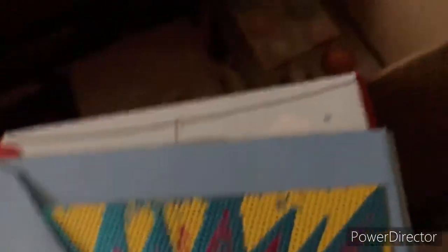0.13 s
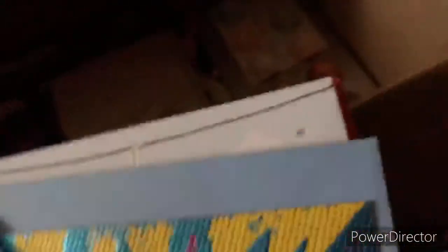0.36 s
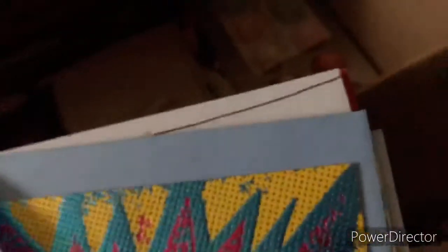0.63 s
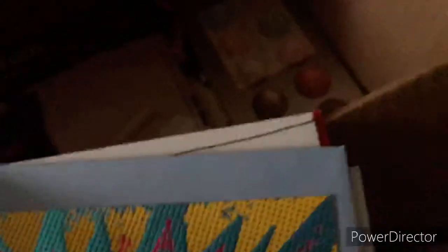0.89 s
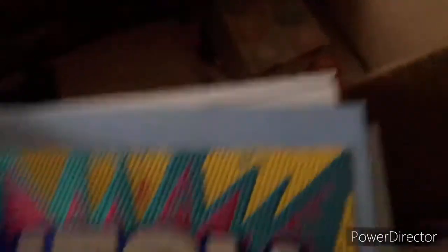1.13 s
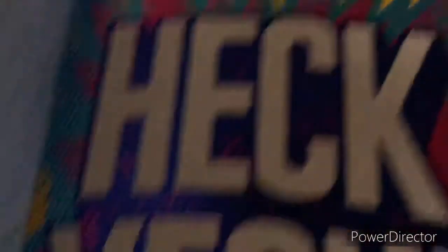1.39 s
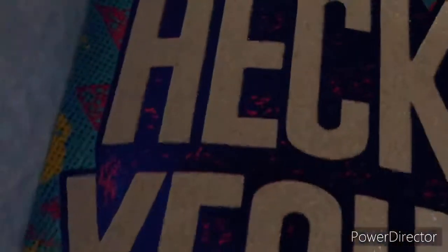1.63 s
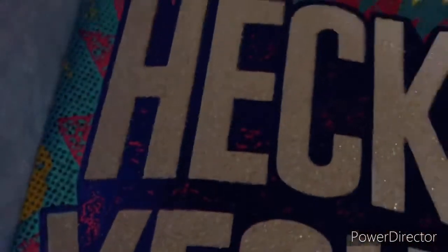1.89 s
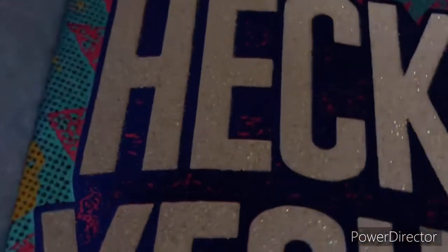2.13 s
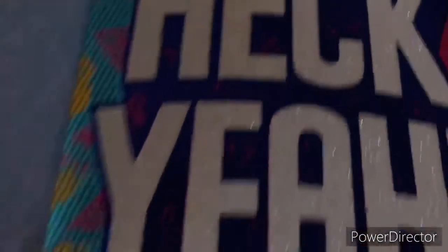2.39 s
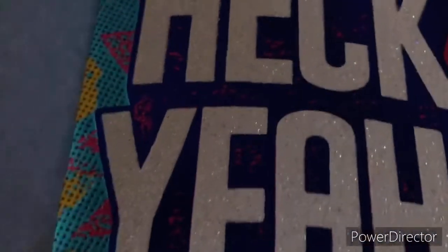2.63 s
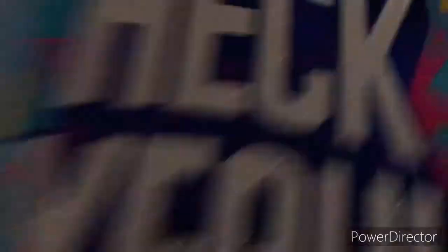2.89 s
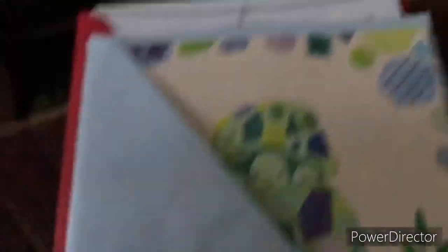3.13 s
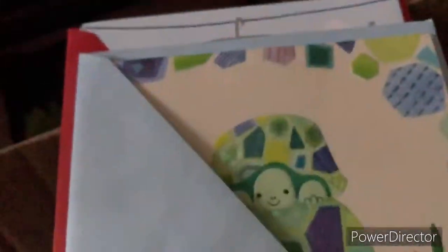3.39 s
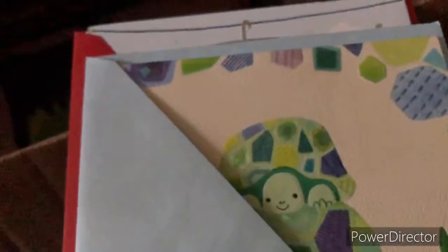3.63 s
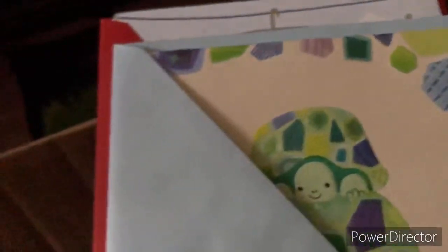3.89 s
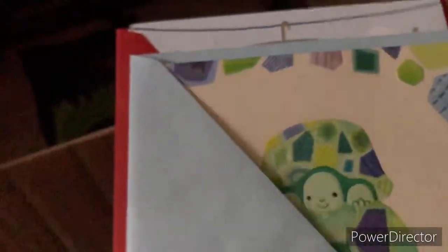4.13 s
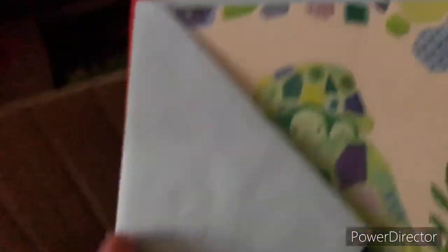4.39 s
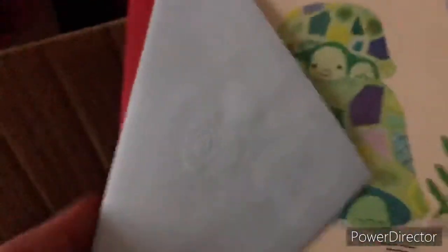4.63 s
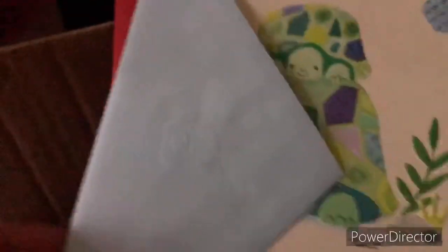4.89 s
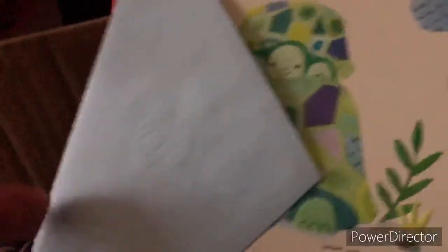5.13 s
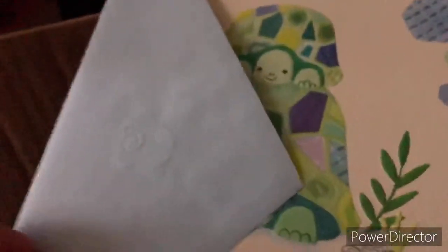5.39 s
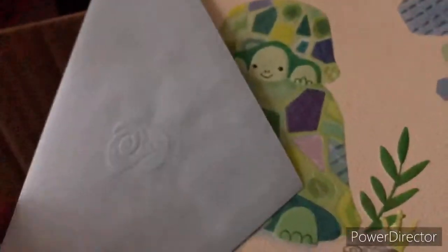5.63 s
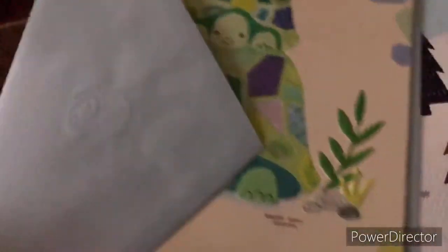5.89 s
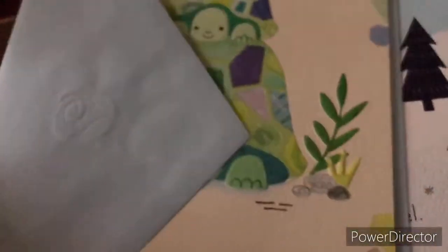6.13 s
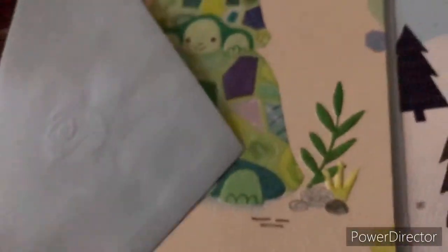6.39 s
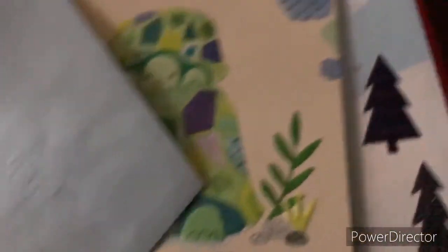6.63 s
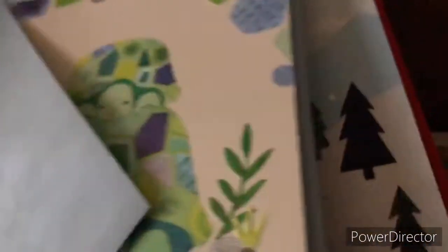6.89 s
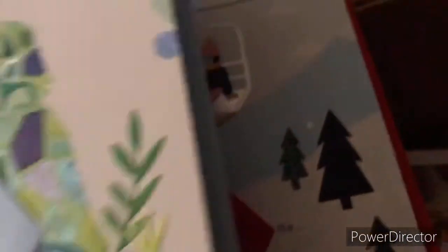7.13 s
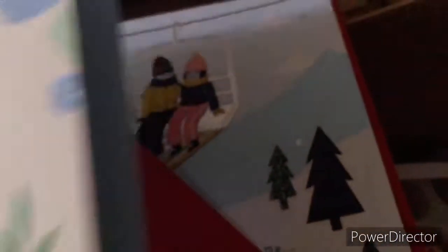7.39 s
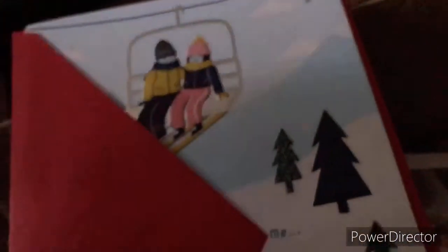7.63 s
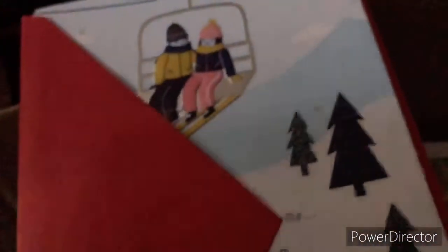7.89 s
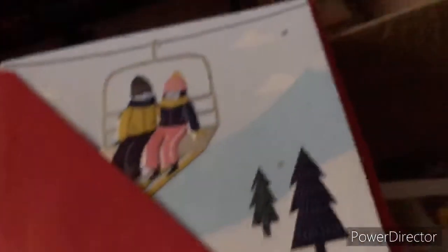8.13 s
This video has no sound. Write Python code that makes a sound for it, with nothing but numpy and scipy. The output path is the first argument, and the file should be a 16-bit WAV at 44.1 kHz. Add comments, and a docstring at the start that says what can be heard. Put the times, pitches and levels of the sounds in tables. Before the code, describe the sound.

Close mono sound of stiff paper cards and envelopes being leafed through in a quiet, dry room with very faint hiss. Soft, airy sliding rustles start at once, with small bumps around 0.5 to 0.6 seconds, then a hard flat slap at about 0.83, by far the loudest event. Papery strokes continue to about 1.5 and thin out, with a light tick and scrape near 2.2. A swelling rustle ends in a crisp knock around 2.9, and another double knock comes at 3.3. Small ticks patter from 3.6 to 4.1. From 4.2 to 6.3 the leafing is dense, overlapping hissy slides with light taps around 5.25, 5.5, 5.7 and 6.2. Afterward the rustling grows faint, with tiny clicks near 7.4 to 7.8 and near silence around 8, until a last firm slap at 8.2 and a short trailing rustle.

```python
"""Stiff paper cards and envelopes are leafed through close to a mono microphone in a quiet room.
Soft rustles lead to a hard slap near 0.83 s; strokes follow and thin out, until blows near 2.9 and 3.3 s.
From 4.2 s the leafing is dense; after 6.3 s it grows faint, and a last slap comes near 8.2 s.
Strokes are swelling friction noise; taps are rough pushes that ring the card and thuds are soft smooth pushes
that ring the stack, both through bending waves (treble ahead of bass); grips swell noise over faint room hiss."""
import sys
import numpy as np
from scipy import signal
from scipy.fft import rfft, irfft, next_fast_len
from scipy.io import wavfile
from scipy.ndimage import uniform_filter1d, map_coordinates

SR = 44100
rng = np.random.default_rng(int(sys.argv[2]) if len(sys.argv) > 2 else 0)


def volts(x):
    """Linear amplitude factor 10**(x/20) for a level x in dB, scalar or array-like."""
    e = np.asarray(x, float) / 20
    return 10 ** e


def log_audio(samples):
    """Write samples as a 16-bit WAV file to the path given in sys.argv[1]."""
    # one column per channel
    frames = np.atleast_2d(samples).T
    # limit to full scale, then quantise
    limited = np.clip(frames, -1, 1)
    pcm = np.round(limited * 32767).astype(np.int16)
    wavfile.write(sys.argv[1], SR, pcm)


N = 364341  # samples


def unit(x):
    """Power normalisation: the signal is scaled to rms 1."""
    return x / np.sqrt(np.mean(x ** 2) + 1e-20)


def peak(rows):
    """Peak normalisation: each row is scaled to a peak of 1."""
    return rows / np.abs(rows).max(axis=1, keepdims=True)


def placed(rows, start_s):
    """Superposition: rows of sound are summed at their start times."""
    at = np.round(start_s * SR).astype(int) + np.arange(rows.shape[1])
    return np.bincount(at.ravel(), rows.ravel(), N + SR)[:N]


def along(points, hz):
    """Logarithmic pitch scale: (Hz, value) points are interpolated over log frequency."""
    point_hz, values = np.transpose(points)
    return np.interp(np.log(hz + 1), np.log(point_hz + 1), values)


def wobble(rate):
    """Slow random modulation: a smooth curve through random knots, rate of them a second."""
    knots = rng.standard_normal(int(N * rate / SR) + 4)
    return map_coordinates(knots, [np.arange(N) * rate / SR])


def filtered(x, response):
    """Linear filtering: the spectrum is multiplied by a complex response of frequency."""
    size = next_fast_len(x.shape[-1] + SR // 4)
    spectrum = rfft(x, size) * response(np.fft.rfftfreq(size, 1 / SR))
    return irfft(spectrum, size)[..., :x.shape[-1]]


def coloured(x, colour):
    """Spectral shaping: x passes a (Hz, dB) curve and is set to rms 1."""
    return unit(filtered(x, lambda hz: volts(along(colour, hz))))


def bending(hz):
    """Dispersion of bending waves: the delay grows as one over root frequency."""
    return np.exp(-2j * np.pi * .11 * np.sqrt(hz))


def resonances(modes, hz, favoured_hz, octave_db):
    """Modal excitation: the spot that is struck favours the modes near one pitch."""
    total = 0
    for k, (centre, width, db) in enumerate(modes):
        gain = volts(db - octave_db * np.abs(np.log2(centre / favoured_hz)))
        damping = 1j * hz * width
        # neighbouring modes have opposite signs
        total = total + (-1) ** k * gain * damping / (centre ** 2 - hz ** 2 + damping)
    return total


def swells(top_s, rise_s, fall_s, db):
    """Incoherent addition: rounded swells are joined into one gain as powers."""
    t = np.arange(0, N / SR + 1, 1 / 1000)
    away = np.where(t < top_s, (top_s - t) / rise_s, (t - top_s) / fall_s)
    # 20 dB are lost one rise before and one fall after the top; exponent 1 = pointed, 2 = round
    power = np.sum(volts(db - 20 * away ** 1.44) ** 2, axis=0)
    return np.interp(np.arange(N) / SR, t, np.sqrt(power))


# The pitch at which the air gap between the sheets colours the hiss.
# Each row: time in seconds, frequency in Hz.
AIR_GAP = [(0.0, 4400), (0.37, 4270), (0.66, 2540), (1.03, 2540), (1.17, 4500), (1.5, 4000), (1.9, 6200),
           (2.15, 6000), (2.51, 3350), (2.85, 2700), (3.4, 2800), (3.95, 4380), (4.15, 3400), (4.5, 3300),
           (4.95, 3900), (5.15, 3400), (5.45, 3600), (5.9, 3400), (6.21, 5280), (6.81, 3280), (7.15, 3970),
           (8.26, 2850)]


def patchy(depth_db, bump_db):
    """Gap resonance in uneven noise: gain drifts in patches, lifted at the gap's pitch and 0.8 octave below."""
    hz, t, noise = signal.stft(rng.standard_normal(N + 512), SR, nperseg=512)
    field = uniform_filter1d(rng.standard_normal(noise.shape), size=5, axis=0)
    field = uniform_filter1d(field, size=24, axis=1)
    octaves = np.log2((hz[:, None] + 1) / np.interp(t, *np.transpose(AIR_GAP)))
    bump = np.exp(-(octaves / 0.49) ** 2) + 0.67 * np.exp(-((octaves + .8) / .15) ** 2)
    gain_db = depth_db * unit(field) + bump_db * bump
    return signal.istft(noise * volts(gain_db), nperseg=512)[1][:N]


# The spectrum of the room and microphone noise. Each row: frequency in Hz, relative level in dB.
AIR_COLOUR = [(15, -47), (25, -11.5), (96, -16), (156, -9), (254, -7), (299, -12.5), (498, -13.5),
              (1030, -20), (11400, -34.5), (12300, -33.5), (15700, -38)]


def air():
    """Stationary background noise: the quiet room and the microphone's own hiss."""
    return volts(-70.5) * coloured(patchy(depth_db=1.2, bump_db=0), AIR_COLOUR)


# The decay of the room's short answer. Each row: frequency in Hz, time to fall by 60 dB in seconds.
ROOM_DECAY = [(100, 0.13), (400, 0.011), (1800, 0.019), (10000, 0.027)]


def room(x):
    """Reverberation: each frequency of the room's answer dies at its own speed."""
    hz, t, noise = signal.stft(rng.standard_normal(SR // 4), SR, nperseg=256)
    decay = volts(-60 * t / along(ROOM_DECAY, hz)[:, None])
    tail = signal.istft(noise * decay, SR, nperseg=256)[1]
    dull = filtered(tail, lambda hz: 1 / (1 + 1j * hz / 1500))  # soft furnishings take the treble
    late = np.pad(x, (SR // 400, 0))  # the answer starts 2.5 ms late
    return signal.fftconvolve(late, dull / np.linalg.norm(tail))[:N]


# The hand shifts or squeezes the stack.
# Each row: strongest moment in seconds, fall by 20 dB in seconds, hand rustle in dB,
# sheet body in dB over the rustle, boom in dB over the rustle.
GRIPS = [(.05, .04, -70.5, -2, -9), (.1, 0.088, -71, 1, -5), (.25, 0.14, -64.5, -1, -16),
         (.33, 0.14, -62, -0.5, 4), (.51, 0.073, -58.5, 0, 7.5), (.56, .06, -63, -11, 12),
         (.59, .025, -48, -1, -2), (.64, 0.07, -50.5, -8, -2), (0.699, 0.093, -55.5, 3, 4.5),
         (0.839, .022, -29, -1, -13), (.865, 0.053, -45, -9.5, -4), (1.003, 0.15, -65, 8, -7),
         (1.13, 0.36, -62, 5.5, -12), (1.26, 0.056, -51, -18, -5), (1.36, 0.3, -61.5, -7, -8),
         (1.538, 0.029, -53, -20, -18), (1.65, 0.091, -54.5, -6.5, -27), (1.82, 0.1, -56.5, -13, -7),
         (2.05, 0.35, -67, -2.5, -4), (2.19, 0.027, -73, 11, -18), (2.35, 0.22, -73, 2, 0),
         (2.52, .08, -75.5, 0.5, 2), (2.81, 0.054, -63.5, 6, 3.5), (2.862, 0.023, -49, 0, 0),
         (2.924, 0.028, -49, -8.5, -9), (2.965, 0.036, -64, -3, 8), (3.05, 0.039, -65, -10.5, 10),
         (3.15, 0.073, -64, -13, -1.5), (3.33, 0.021, -41, 1.5, -11.5), (3.398, .1, -59, 0, 4.5),
         (3.566, 0.016, -56.5, -7, -11), (3.6, 0.041, -60.5, -3.5, -3), (3.77, 0.018, -59, -5, -24),
         (3.906, 0.11, -75, 8, 5.5), (4.01, 0.067, -71.5, -3, 0), (4.087, 0.062, -62, 1.5, 0),
         (4.21, 0.18, -66.5, 5, 3), (4.3, 0.17, -64, -2, -5), (4.425, 0.045, -65, -10, -3),
         (4.542, 0.13, -58.5, 5, -12), (4.68, 0.13, -62, 4, -14), (4.85, 0.085, -61, -0.5, -6),
         (5.194, 0.025, -58.5, 8.5, -12), (5.224, 0.057, -52, 3.5, -19), (5.255, .05, -54.5, -5, -24),
         (5.33, 0.12, -66, -9, -3), (5.391, 0.037, -54.5, -9, -5), (5.51, 0.024, -56.5, -8, 6),
         (5.585, 0.046, -60.5, -8, 3), (5.7, 0.13, -60.5, -1, -3), (5.8, 0.13, -70, 5, -2),
         (5.92, 0.048, -65, -7, -4), (6.1, .03, -60, -12, -11), (6.185, 0.023, -51.5, -11, -1),
         (6.32, 0.18, -76, 7, 5), (6.55, 0.22, -77.5, 6, -4), (6.69, 0.095, -59, 0, 0.5),
         (6.78, 0.021, -56, 2.5, -5), (6.9, .06, -89, -2, 6), (7.05, 0.062, -83, 1, 1),
         (7.25, .08, -100, -4, 4), (7.445, 0.027, -62.5, -15, -8), (7.681, 0.065, -67, -11, -2.5),
         (7.76, .04, -73, -8.5, -1.5), (8.0, 0.063, -81, -6.5, -4), (8.197, 0.022, -42.5, 5.5, -7),
         (8.25, 0.091, -47, -3, -2)]


def gripping(column):
    """Common excitation: one grip drives the hand (0), the sheet's body (1) and the boom (2)."""
    top_s, fall_s, hand_db, body_db, boom_db = np.transpose(GRIPS)[:, :, None]
    level_db = [hand_db, hand_db + body_db, hand_db + boom_db][column]
    return swells(top_s, 0.75 * fall_s, fall_s, level_db)


# The spectrum of the shaken stack. Each row: frequency in Hz, relative level in dB.
BOOM_COLOUR = [(20, -44.5), (45, -10.5), (90, -5), (120, -1.5), (160, -6.5), (260, -41)]


def flexing():
    """Forced vibration: the grip shakes the stack's lowest modes."""
    gain = np.hypot(volts(-74), gripping(2))  # the stack hums faintly as long as it is held
    return gain * coloured(rng.standard_normal(N), BOOM_COLOUR)


# The modes the stack thumps with.
# Each row: frequency in Hz, width in Hz, level in dB before one pitch is favoured.
STACK_MODES = [(125, 40, -8.5), (195, 110, -6.5), (345, 80, -3), (450, 110, 0)]
# A card lands flat on the stack. Each row: start in seconds, peak level in dB, favoured ring in Hz.
THUDS = [(0.502, -45.5, 153), (0.603, -39.5, 121), (0.831, -16, 404), (1.804, -41.5, 260),
         (2.862, -36, 205), (2.904, -32.5, 253), (2.918, -31, 196), (3.313, -43, 527), (3.328, -38, 272),
         (3.585, -44.5, 460), (5.249, -42.5, 413), (5.377, -44, 374), (5.493, -38, 133), (6.174, -49, 147),
         (8.188, -34.5, 414), (8.23, -40, 288)]


def thuds():
    """Impulse response: a soft, smooth, broad push of about a millisecond rings the stack's low modes."""
    t = np.arange(SR // 5) / SR
    start_s, peak_db, ring_hz = np.transpose(THUDS)[:, :, None]
    push = t * np.exp(-t / .00035)
    thud = filtered(push, lambda hz: resonances(STACK_MODES, hz, ring_hz, octave_db=12.5) * bending(hz))
    return placed(volts(peak_db) * peak(thud), start_s)


# The modes a tapped card rings with.
# Each row: frequency in Hz, width in Hz, level in dB before one pitch is favoured.
CARD_MODES = [(830, 370, -7), (1032, 320, -4), (1526, 330, -5.5), (2070, 130, -0.5), (2720, 600, -1),
              (3530, 480, 4.5), (4814, 5100, 0.5)]
# The spectrum of an edge tick. Each row: frequency in Hz, relative level in dB.
TICK_COLOUR = [(2500, -38.5), (5500, -2), (7500, -1), (11000, -4.5), (16000, -5.5)]
# Edges and corners touch. Each row: start in seconds, peak level in dB, edge tick in dB over the card knock,
# favoured ring in Hz, time for the push to fall by 60 dB in milliseconds.
TAPS = [(.089, -46.5, 1.5, 600, 2.4), (.555, -40, 15, 3800, 4.7), (.603, -27, -31, 1200, 1.1),
        (.817, -33, 13, 1230, 3.2), (.828, -21, -1, 1140, 4.5), (.831, -13, -4, 1030, 2.5),
        (1.157, -32, 14, 4500, 4), (1.533, -37.5, 3.5, 5160, 30), (1.66, -43.5, -10, 1060, 5.7),
        (2.156, -42.5, 3, 2550, 7.5), (2.24, -36, 7, 5790, 5), (2.906, -33, 1, 710, 6),
        (2.916, -17.5, 2.5, 2310, 11), (2.925, -31.5, 3, 1390, 3.8), (3.009, -33, 8, 1200, 2.2),
        (3.022, -48, -0.5, 960, 4.2), (3.311, -19, 1, 1220, 7), (3.32, -23.5, -18, 1500, 3.5),
        (3.328, -22, -19, 2730, 6.2), (3.373, -36.5, 4.5, 1010, 3.4), (3.583, -42, 5, 610, 6.3),
        (3.645, -41.5, -11, 1080, 6.1), (3.7, -60, -6, 2810, 3.5), (3.723, -36.5, 8.5, 1090, 1.36),
        (3.769, -60, -3, 600, 3.5), (3.803, -26.5, 12.5, 610, 1.95), (3.845, -51.5, -13, 1300, 5.1),
        (3.879, -51.5, -20, 2450, 2.7), (4.054, -34.5, -2, 5140, 3), (4.064, -34, 14.5, 4060, 7),
        (4.071, -41, -1.5, 4600, 3.2), (4.084, -33, 11, 1110, 4.1), (4.094, -35, 5, 1970, 7.7),
        (4.108, -42.5, -8, 2690, 4.3), (4.121, -41, 5, 2030, 2.9), (4.224, -39, 8, 1870, 2.3),
        (4.291, -45, 11, 1090, 1.6), (5.063, -41, -22, 1640, 2.4), (5.186, -37, -15, 3740, 4.1),
        (5.247, -35, 11, 1130, 1.9), (5.378, -45.5, -6, 600, 3.9), (5.493, -31, -7, 830, 2.9),
        (5.665, -29, -4, 4200, 1.75), (5.874, -36.5, -18, 2000, 1.8), (6.071, -40, 9, 5180, 3),
        (6.171, -34.5, 14, 5410, 6.6), (6.394, -37, 2, 4720, 3.5), (6.468, -49.5, 21, 4870, 2.8),
        (6.762, -44, -16, 730, 6.1), (6.771, -53, -19, 2400, 4.6), (6.778, -43, -20, 1900, 10),
        (6.785, -46, -7, 900, 4), (7.415, -64, -16, 1200, 3.3), (7.436, -56, -11, 994, 2.5),
        (7.455, -47, -4.5, 1380, 2.9), (7.575, -47, -0.5, 3650, 4.7), (7.7, -54.5, 3, 930, 4.1),
        (7.708, -50.5, -1, 3020, 3), (7.724, -56, 7, 4940, 3), (7.738, -53, 3, 4000, 3),
        (7.765, -55.5, -2, 1400, 2.9), (7.838, -60, -12, 2710, 2.7), (8.135, -59.5, 19, 660, 4),
        (8.178, -32, 5, 960, 3), (8.193, -21.5, -4.5, 2810, 6), (8.198, -22.5, -22, 2740, 6.6),
        (8.229, -29.5, 2, 1000, 4.2)]


def taps():
    """Impact excitation: each contact is a short rough push that ticks at the edge and knocks the card."""
    lead_s = 1 / 200  # silence ahead of the contact
    after_s = np.clip(np.arange(SR // 16) / SR - lead_s, 0, None)
    start_s, peak_db, tick_db, ring_hz, length_ms = np.transpose(TAPS)[:, :, None]
    push = (1 - np.exp(-after_s / 0.00058)) * volts(-60 * after_s * 1000 / length_ms)
    push = push * rng.standard_normal(push.shape)
    # a clean first contact stands out of the rough push
    blow = push + 2.8 * (np.arange(after_s.size) == round(lead_s * SR) + 8)

    def edge(hz):
        return volts(along(TICK_COLOUR, hz)) * bending(hz)

    def card(hz):
        soft = (1 + 1j * hz / (2.3 * ring_hz)) ** 2  # a contact that rings low is too soft for the treble
        return resonances(CARD_MODES, hz, ring_hz, octave_db=8) * bending(hz) / soft

    tick, knock = peak(filtered(push, edge)), peak(filtered(blow, card))
    return placed(volts(peak_db) * peak(volts(tick_db) * tick + knock), start_s - lead_s)


# The spectra of the hiss, of the sheen above it, of the sheet's body and of the rustling hand.
# Each row: frequency in Hz, relative level in dB.
HISS_COLOUR = [(800, -63), (1900, -4), (2600, 3.5), (4500, 1.5), (6500, -1), (9000, -9), (14000, -32)]
SHEEN_COLOUR = [(3000, -60), (6500, -2.5), (8500, 1), (12000, 1.5), (15700, 1.5)]
BODY_COLOUR = [(250, -13), (550, 5), (1000, 3.5), (1900, 3.5), (2800, -23.5), (6000, -41)]
HAND_COLOUR = [(80, -33.5), (170, -6), (250, -2.5), (450, -4.5), (700, -11.5), (2000, -60)]
# Peaks and dips of a rubbed card. Each row: frequency in Hz, relative level in dB.
RUBBED_CARD = [(1500, 3.5), (1950, 1), (2350, -1.5), (2800, -2.5), (3350, 1), (3950, 0), (4550, 2.5),
               (5400, 1), (6300, 0.5), (7200, -0.5)]
# Paper slides on paper. Each row: strongest moment in seconds, rise from 20 dB below in seconds,
# fall by 20 dB in seconds, hiss level in dB, sheen in dB over the hiss.
STROKES = [(.06, 0.12, 0.27, -72, -7), (.187, .005, .03, -65, 4), (.219, 0.04, 0.04, -54, 1.5),
           (0.264, .005, .04, -58.5, 6), (0.309, 0.027, 0.021, -49.5, 5), (.39, 0.12, 0.27, -51.5, -4.5),
           (.505, 0.062, 0.034, -51.5, -5), (.56, 0.025, 0.29, -53, -4), (.69, 0.22, .06, -52.5, -0.5),
           (.77, 0.12, 0.25, -50.5, -3), (0.835, 0.0074, 0.012, -27, -18), (.85, .011, 0.06, -59.5, -18),
           (1.003, 0.052, 0.19, -50, -1.5), (1.2, 0.29, 0.12, -52.5, -7), (1.311, 0.072, 0.04, -54.5, -5),
           (1.46, 0.39, 0.16, -57.5, -6.5), (1.545, 0.045, 0.018, -66.5, -5), (1.65, .1, 0.11, -60.5, -4),
           (1.75, 0.12, 0.042, -59.5, -1.5), (1.86, .1, .055, -63, 0.5), (1.96, 0.056, 0.16, -64.5, -1),
           (2.102, 0.16, 0.12, -68, -9), (2.2, .05, .04, -74, -5), (2.246, 0.012, 0.043, -49, -10),
           (2.35, 0.073, 0.13, -71, -30), (2.51, 0.058, 0.069, -73, -8.5), (2.8, 0.046, 0.045, -69, -15),
           (2.853, 0.052, 0.044, -38, -3), (2.929, 0.11, 0.036, -51.5, -5),
           (3.025, .011, 0.026, -65.5, -15), (3.109, 0.027, 0.045, -59, 0.5),
           (3.16, .05, 0.043, -64.5, -2.5), (3.205, 0.017, 0.023, -68.5, -0.5), (3.25, .05, .06, -77, -5),
           (3.324, 0.012, 0.028, -37.5, -15), (3.369, 0.042, 0.027, -48, 4), (3.398, .006, .011, -51, -11),
           (3.43, 0.086, 0.54, -61.5, -0.5), (3.552, 0.038, 0.01, -54.5, -4),
           (3.61, 0.027, 0.039, -66, -10), (3.7, .02, .02, -85, -13), (3.78, 0.059, 0.3, -72, -12),
           (3.92, 0.13, 0.21, -73, -10), (4.085, 0.044, 0.054, -57.5, 0), (4.2, 0.11, 0.23, -54.5, -3),
           (4.39, 0.092, 0.099, -59.5, 4.5), (4.44, 0.043, 0.1, -51, 5), (4.475, .05, 0.02, -55, 11),
           (4.52, 0.12, 0.3, -52.5, -4), (4.59, 0.067, 0.14, -49.5, -2), (4.68, 0.16, 0.3, -57.5, 3.5),
           (4.8, 0.11, 0.069, -60.5, 3.5), (4.93, 0.23, 0.054, -55, -7), (5.02, 0.24, 0.067, -60, 7.5),
           (5.09, 0.09, 0.098, -53.5, -6.5), (5.16, 0.0099, 0.04, -60, 6), (5.192, 0.01, .08, -48, -10),
           (5.24, 0.1, .025, -53, -18), (5.27, 0.028, 0.025, -55.5, -12), (5.33, 0.027, 0.03, -55.5, 8.5),
           (5.39, 0.15, 0.03, -60.5, -17), (5.424, 0.022, 0.11, -50.5, 0.5),
           (5.505, 0.083, 0.023, -52.5, 7), (5.61, 0.13, 0.18, -57.5, 1.5), (5.71, 0.062, 0.22, -54, -8),
           (5.83, 0.15, 0.22, -57, -10.5), (5.92, 0.15, 0.14, -56.5, -6), (6.02, 0.3, .06, -55.5, 0.5),
           (6.085, 0.077, 0.047, -54, 1), (6.125, 0.055, 0.015, -56, 0), (6.179, 0.0053, 0.0081, -49.5, 7),
           (6.207, 0.0046, 0.068, -56, 4), (6.3, .05, 0.087, -55, 0), (6.394, 0.034, 0.032, -59, 2.5),
           (6.472, 0.0064, 0.057, -64, 5.5), (6.575, 0.14, 0.24, -58, -2), (6.69, 0.036, 0.13, -54, -10),
           (6.82, 0.079, 0.065, -67, -5), (6.909, 0.087, 0.099, -56.5, -3.5), (7.0, .06, 0.063, -65, -5.5),
           (7.065, 0.029, 0.062, -59.5, -2.5), (7.13, 0.033, 0.02, -65.5, -11),
           (7.188, .015, 0.19, -60, -5), (7.275, .1, 0.042, -60.5, -2.5), (7.465, 0.028, 0.018, -68.5, -12),
           (7.541, 0.091, 0.15, -69, -5), (7.675, 0.019, .02, -67.5, -3.5), (7.73, 0.068, .08, -72, -6),
           (7.922, .006, 0.025, -61.5, -4.5), (7.95, 0.019, 0.055, -73.5, -3.5),
           (8.05, .08, 0.064, -81.5, -5), (8.135, .008, 0.056, -72.5, -2.5),
           (8.18, 0.0021, .02, -51, -10.5), (8.196, 0.016, 0.022, -40, -5), (8.24, 0.055, .2, -48, -12)]


def strokes():
    """Stick-slip friction: fibres catch and let go thousands of times a second, in every colour of the sheet."""
    top_s, rise_s, fall_s, hiss_db, sheen_db = np.transpose(STROKES)[:, :, None]
    hiss_gain = swells(top_s, rise_s, fall_s, hiss_db)
    sheen_gain = swells(top_s, rise_s, fall_s, hiss_db + sheen_db)
    # every stroke also stirs the sheet's body and the hand, under its hiss
    body_gain = np.hypot(volts(-10.5) * hiss_gain, gripping(1))
    hand_gain = np.hypot(volts(-17) * hiss_gain, gripping(0))
    catches = (rng.random(N) < .06) * rng.standard_normal(N)
    rub = unit(patchy(depth_db=1.9, bump_db=2.5)) + 0.45 * unit(catches)
    rub = coloured(rub, RUBBED_CARD)
    # the pressure of the finger trembles
    rub = rub * volts(1.1 * wobble(45) + 1.2 * wobble(140))
    hand = coloured(rng.standard_normal(N) * volts(1.5 * wobble(22)), HAND_COLOUR)
    sheet = hiss_gain * coloured(rub, HISS_COLOUR) + sheen_gain * coloured(rub, SHEEN_COLOUR)
    return sheet + body_gain * coloured(rub, BODY_COLOUR) + hand_gain * hand


def scene():
    """Superposition at one microphone, which feeds both channels; only the hits rouse the room."""
    hits = taps() + thuds()
    mix = hits + volts(-4.5) * room(hits) + strokes() + flexing() + air()
    return np.tile(mix, (2, 1))


def band_limit(x):
    """A steep low-pass at the top of the band."""
    return signal.sosfilt(signal.butter(12, 16820, fs=SR, output="sos"), x)


def record(dry):
    """Band limiting: the microphone weakens the deepest bass, and the treble falls steeply above 15850 Hz."""
    band = [(18, -14), (45, 0), (15850, 0), (16000, -22), (16700, -40), (17000, -120)]  # Hz, dB
    return band_limit(filtered(dry, lambda hz: volts(along(band, hz))))


dry = scene()
out = record(dry)
log_audio(out)
```